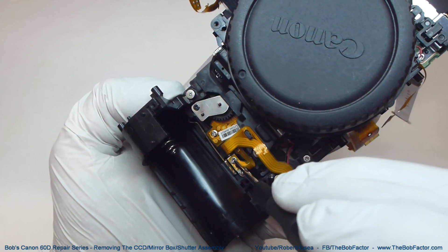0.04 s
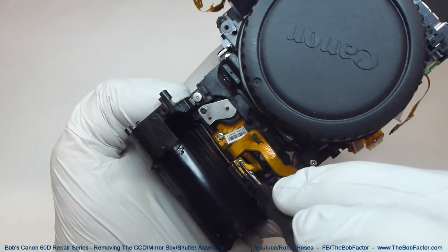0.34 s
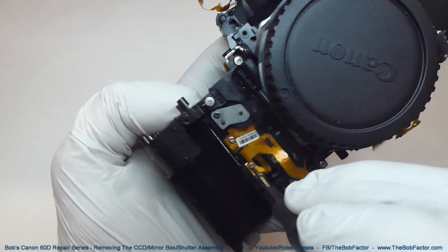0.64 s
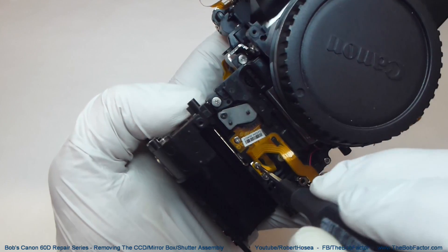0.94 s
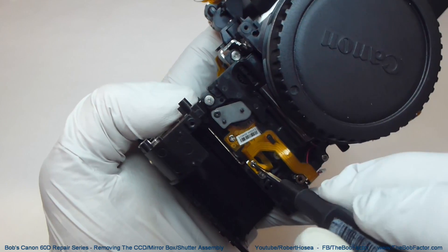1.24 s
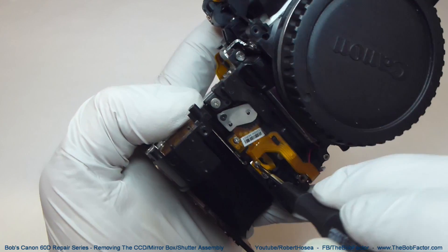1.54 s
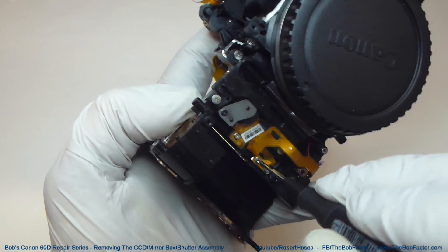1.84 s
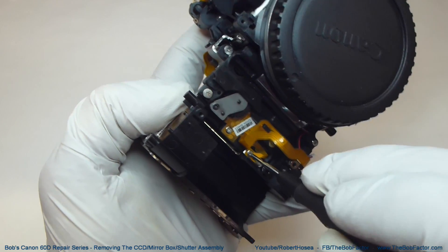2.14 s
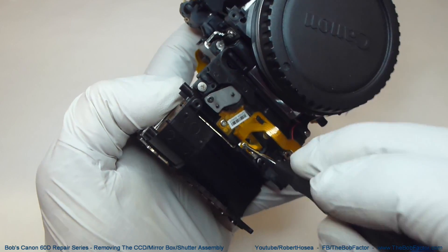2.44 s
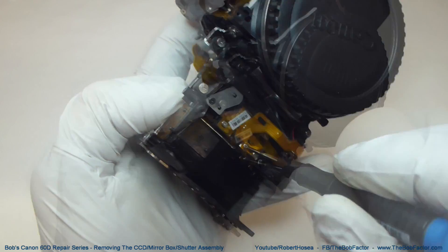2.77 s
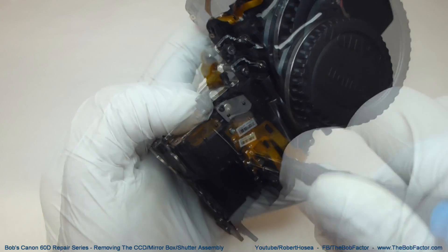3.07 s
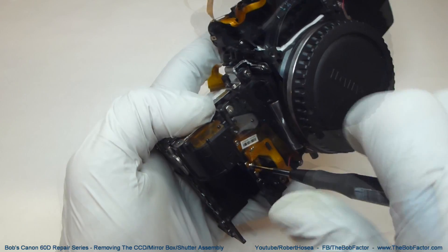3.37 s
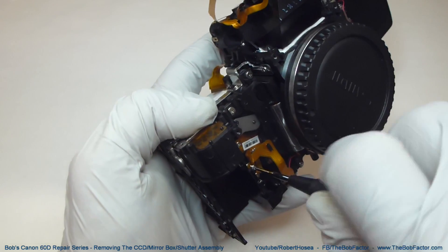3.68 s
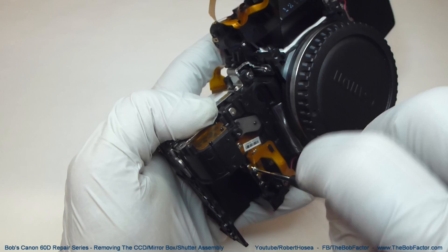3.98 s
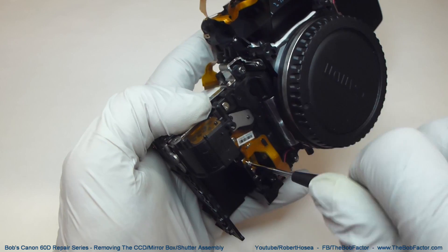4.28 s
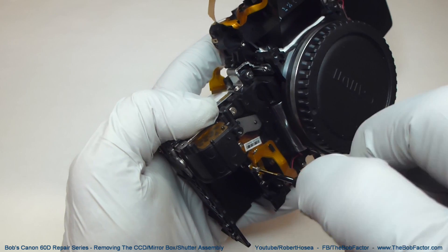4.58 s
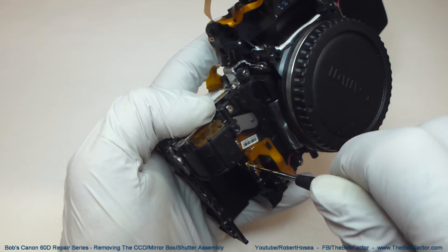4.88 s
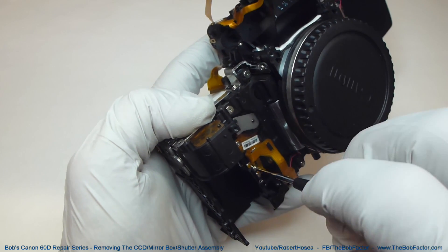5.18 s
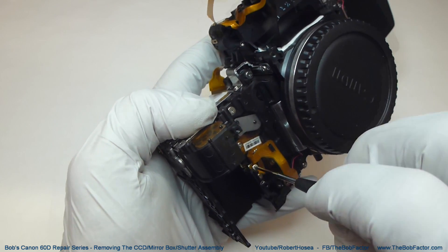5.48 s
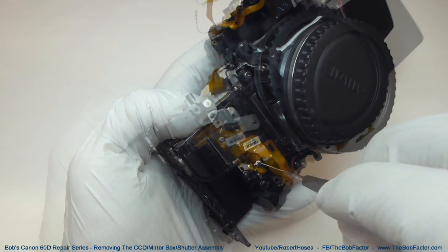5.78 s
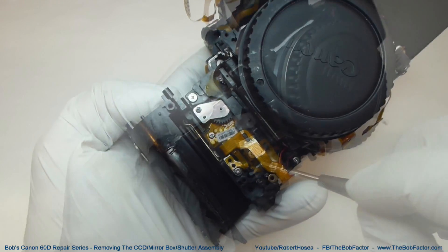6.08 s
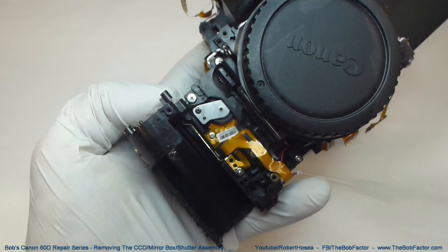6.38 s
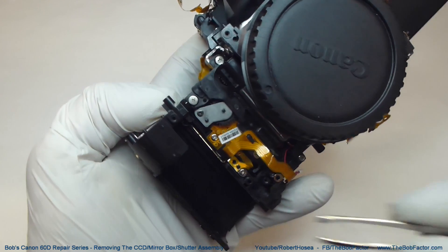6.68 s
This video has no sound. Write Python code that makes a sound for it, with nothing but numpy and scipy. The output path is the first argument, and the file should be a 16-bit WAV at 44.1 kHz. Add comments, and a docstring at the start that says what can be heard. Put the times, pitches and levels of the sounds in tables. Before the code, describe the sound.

A small screwdriver knocks in the screw heads of a camera body, making a few sharp, separate clicks with a very short metallic ring. After the loudest click, a tight screw gives a quick cluster of high squeaks. Lighter ticks and faint rubbing of gloves on the handle follow. The sounds are close and fairly dry, over quiet room hiss and a faint electrical hum.

```python
"""A small screwdriver works on the screws of a camera body, held in gloved hands over a desk.
The bit ticks in the screw heads and rings the chassis; one tight thread sticks and slips in quick squeaks.
Gloves rub the handle in short strokes, over quiet room hiss, faint mains hum and a late low drone.
A gain control ducks after the loudest sounds and creeps back."""
import sys
import numpy as np
from scipy import signal
from scipy.fft import rfft, irfft, next_fast_len
from scipy.io import wavfile
from scipy.ndimage import uniform_filter1d, map_coordinates

SR = 44100
rng = np.random.default_rng(int(sys.argv[2]) if len(sys.argv) > 2 else 0)


def wrap_up_sound(samples):
    """Save the sound to the file named by the first command line argument, as 16-bit audio."""
    columns = np.atleast_2d(samples).T
    # keep every value between -1 and 1, then stretch to whole-number steps
    tamed = np.clip(columns, -1, 1)
    steps = np.round(tamed * 32767).astype(np.int16)
    wavfile.write(sys.argv[1], SR, steps)


N = 305172


def knocks(crack_t60_s=0.015, build_up_s=0.00049, detune=0.008, notch_hz=1550, notch_q=5):
    """Bit knocks in a screw head: a short crack plus a hand-damped chassis ring."""
    # (time [s], level [dB], crack re ring [dB], hardness [dB/octave], ring pitch [ratio])
    hits = [(0.0438, -20, -17.5, 7.5, 1.03), (0.0683, -23, -19, 9, 1.02), (0.3246, -10.5, -8.5, -7, 1),
            (0.9262, -12, -12.5, 1, 1.02), (1.7914, -23, -12, -11.5, 1.02), (2.2844, -40, 1.5, 8, 1.1),
            (2.6506, 2, -14, 4.5, 1.0), (3.0454, -44, -2.5, 4, 0.96), (4.6225, -27.5, -2, -11.5, 1.05)]
    # chassis modes: (frequency [Hz], level [dB], t60 [s])
    modes = [(1092, -24, 0.018), (1140, -10, 0.029), (2130, -34, 0.015), (2136, 6, 0.02), (2265, -5, 0.031),
             (2500, -15.5, 0.053), (2500, -14, 0.021), (2890, -18, 0.033), (3460, -17, 0.014),
             (3600, -20, 0.009), (4290, -28, 0.015), (5170, -18, 0.015), (6920, -38, 0.067),
             (9100, -38, 0.033)]
    # (frequency [Hz], density [dB])
    crack_spectrum = [(400, -41), (1150, -5.5), (1550, 6), (2200, 13), (3400, 6.5), (4700, 2),
                      (7000, -13.5), (10500, -8.5), (16000, -21)]
    out, t = np.zeros(N), np.arange(SR // 10) / SR
    hz, mode_db, t60_s = np.transpose(modes)[:, :, None]
    build_up = 1 - np.exp(-t / build_up_s)
    for s, db, crack_db, hardness, pitch in hits:
        # grip and contact point perturb the modes; hard contact favours the high ones
        shift, strength = rng.standard_normal((2, len(hz), 1))
        level_db = mode_db + 2 * strength + hardness * np.log2(hz / hz[0])
        ring_hz = hz * (pitch + detune * shift)
        ring = np.sum(amp(level_db - 60 * t / t60_s) * np.sin(2 * np.pi * ring_hz * t), axis=0)
        crack = coloured(rng.standard_normal(len(t)), crack_spectrum)
        crack *= amp(crack_db - 60 * t / crack_t60_s)
        add(out, s, amp(db) * (build_up * ring / np.abs(ring).max() + crack))
    # antiresonance between the lowest mode groups; a small body radiates little bass
    out = signal.lfilter(*signal.iirnotch(notch_hz, notch_q, SR), out)
    return signal.sosfilt(signal.butter(3, 700, "high", fs=SR, output="sos"), out)


def squeaks(slide_hz=8400, bite_s=0.0019, free_s=0.0019, free_share=0.57, rise_power=3.4):
    """Thread stick-slip: pitch drops as it bites, steadies, then rises and frays as it lets go."""
    # (time [s], level [dB], pitch [Hz], length [s], pitch rise [share], fade [dB], roughness [0-1])
    bites = [(3.8008, -1, 6690, 0.0014, 0.0021, 6.5, 0), (3.8048, -20, 7600, 0.0042, 0.01, -3, 0.3),
             (3.8792, -11.5, 5555, .0105, .08, 1.5, 0.37), (3.9154, -7, 5514, 0.012, 0.25, 11, .2)]
    # frayed stick-slip: (frequency [Hz], density [dB])
    rasp_spectrum = [(4500, -8), (5600, -7), (8500, 4), (9800, -19), (11500, -6), (16000, 3.5)]
    # screw radiation: (frequency [Hz], gain [dB])
    radiation = [(2500, -28), (4600, -5), (5500, -3), (8300, 1), (9800, -9), (11000, -2), (12000, 1),
                 (13500, -6), (16000, -12.5)]
    octave_db, rasp_db = -6, -9
    edge_drop_db, edge_rough = 22.5, 0.55
    jitter, waver, flutter_db = 0.062, 0.008, 4.0
    out, t = np.zeros((2, N)), np.arange(-SR // 100, SR // 25) / SR
    for s, level_db, pitch_hz, length_s, rise, fade_db, held_rough in bites:
        progress = np.maximum(t / length_s, 0)
        biting = np.maximum(-t, 0) / bite_s
        freeing = np.maximum(t - length_s, 0) / (free_s + free_share * length_s)
        rising_hz = pitch_hz * (1 + rise * progress ** rise_power)
        hz = np.minimum(rising_hz + biting * (slide_hz - pitch_hz), slide_hz)
        db = level_db - fade_db * np.minimum(progress, 1) - edge_drop_db * (biting + freeing)
        rough = np.interp(biting + freeing, [0, 1], [held_rough, edge_rough])
        # uneven friction shakes pitch and level
        unsteady = jitter * rough * wobble(2560, len(t)) + waver * wobble(682, len(t))
        phase = 2 * np.pi * np.cumsum(hz * (1 + unsteady)) / SR
        strength = np.sqrt(2) * amp(db + flutter_db * np.sqrt(rough) * wobble(800, len(t)))
        for side in out:
            # partials beam unevenly, the octave most, so each side swells differently
            fundamental, octave = (
                amp(k * wobble(500, len(t))) * np.sin(k * phase + 0.15 * k * wobble(300, len(t)))
                for k in (1, 2))
            rasp = amp(rasp_db) * rough * coloured(rng.standard_normal(len(t)), rasp_spectrum)
            add(side, s + t[0], strength * (fundamental + amp(octave_db) * octave + rasp))
    return filtered(out, lambda hz: amp(along(radiation, hz)))


def taps(attack_s=0.0003, t60_s=0.026):
    """Light touches stir only the part under the tip: dry one-band ticks."""
    # (time [s], level [dB], centre [Hz], width [octaves])
    touches = [(1.528, -42, 6400, 0.45), (3.1504, -48, 5500, 0.28), (3.182, -45, 4500, 0.18),
               (3.3845, -43.5, 4200, 0.45), (3.7983, -38, 1430, 0.48), (3.829, -40, 4170, 0.31),
               (3.9718, -44, 4300, 0.56), (4.625, -46, 3920, .25), (4.9010, -41, 4840, .3),
               (5.133, -42, 1680, 1.2), (5.2295, -49, 4500, 0.22), (5.3390, -43.5, 5850, 1.1),
               (6.388, -39, 3200, 0.7)]
    out, t = np.zeros(N), np.arange(SR // 10) / SR
    envelope = amp(-60 * t / t60_s) * (1 - np.exp(-t / attack_s))
    for s, db, centre_hz, octaves in touches:
        bell = lambda hz: np.exp(-0.5 * (np.log2((hz + 1) / centre_hz) / octaves) ** 2)
        band = filtered(rng.standard_normal(len(t)), bell)
        add(out, s, amp(db) * unit(band) * envelope)
    return out


def slips(grain_db=3, grain_hz=1196):
    """Tip skids on metal: gritty bursts that swell and die."""
    # (time [s], level [dB], length [s])
    skids = [(0.315, -36, 0.0069), (2.879, -52, 0.039), (3.538, -51, 0.0085), (4.249, -55.5, 0.017),
             (4.776, -47.5, 0.0092), (5.413, -48.5, 0.017), (5.785, -53.5, 0.053), (6.27, -47, 0.024)]
    # (frequency [Hz], density [dB])
    skid_spectrum = [(250, -65), (800, 1.5), (2500, -3.5), (4500, -1.5), (7000, 2.5), (10500, 4),
                     (13000, -5), (16000, -11)]
    out, t = np.zeros(N), np.arange(SR // 5) / SR
    for s, db, length_s in skids:
        grit = rng.standard_normal(len(t)) * amp(grain_db * wobble(grain_hz, len(t)))
        age = 3 * t / length_s
        add(out, s, amp(db) * coloured(grit, skid_spectrum) * age * np.exp(1 - age))
    return out


def chafes(width_hz=1300, grain_db=4, grain_hz=239.5):
    """Turning bit: weak stick-slip, a grainy band with no settled pitch."""
    # (mid time [s], level [dB], centre [Hz], length [s])
    turns = [(2.088, -63, 5230, 0.097), (3.148, -65, 5250, 0.072), (4.24, -59, 4850, 0.032),
             (4.506, -60, 4630, 0.083), (4.876, -58, 4780, 0.077), (5.057, -60.5, 5110, 0.097),
             (6.391, -57, 4420, 0.045)]
    out = np.zeros(N)
    for s, db, hz, length_s in turns:
        t = np.arange(-2 * length_s, 2 * length_s, 1 / SR)
        envelope = amp(db + grain_db * wobble(grain_hz, len(t))) * np.exp(-2 * (t / length_s) ** 2)
        add(out, s + t[0], envelope * narrow(hz, width_hz, t))
    return out


def gloves(grip_db=-69.5, grain_db=2.0, sway_db=2.5, snags_per_s=39, snag_s=0.003, crackle_db=-8.5):
    """Rubber drags on the handle in tiny catches; the pushed bit crackles."""
    # (start [s], length [s], level [dB])
    strokes = [(2.046, 0.27, -64), (2.446, 0.17, -60), (3.072, .13, -62.5), (3.358, .035, -51),
               (3.41, 0.14, -60), (3.667, 0.21, -59.5), (4.129, 0.16, -57), (4.398, 0.24, -57.5),
               (4.76, 0.17, -56.5), (4.987, .2, -55.5), (5.806, 0.037, -56.5), (6.064, .11, -58),
               (6.334, 0.13, -59.5)]
    # both: (frequency [Hz], density [dB])
    rub_spectrum = [(700, -37), (1500, -5), (3000, -6.5), (4700, 0.5), (6500, -1), (8500, -2.5),
                    (11000, -2.5), (16000, -12.5)]
    crackle_spectrum = [(500, -30), (2800, -10), (4700, 1.5), (6500, -5), (15000, -13)]
    envelopes = [amp(db) * held(s, length_s, attack_s=0.022, release_s=0.03)
                 for s, length_s, db in strokes]
    drag = np.maximum(np.max(envelopes, axis=0), amp(grip_db))
    catches = rng.standard_normal(N) * amp(grain_db * wobble(900, N))
    onsets = 1.0 * (rng.random(N) < snags_per_s / SR)
    snags = signal.lfilter([1], [1, -np.exp(-1 / (snag_s * SR))], onsets)
    crackle = amp(crackle_db) * coloured(snags * rng.standard_normal(N), crackle_spectrum)
    return drag * amp(sway_db * wobble(45, N)) * (coloured(catches, rub_spectrum) + crackle)


def air(level_db=-48.5):
    """Steady room noise: wide mids, centred bass."""
    # (frequency [Hz], density [dB])
    spectrum = [(15, -51), (25, -27), (48, -14.5), (84, -13.5), (113, -9), (148, -8), (205, -8.5),
                (241, -4.5), (284, -6.5), (729, -9), (955, -11.5), (2150, -16), (2330, -16.5),
                (12400, -28.5), (15800, -39)]
    # (frequency [Hz], left-right correlation [-1 to 1])
    correlation = [(60, 0.46), (150, 0.28), (290, 0.1), (640, -0.52), (1400, -0.76), (3100, -0.64),
                   (6800, -0.25), (15000, 0.29)]
    angle = lambda hz: np.arccos(np.clip(along(correlation, hz), -1, 1)) / 2
    split = lambda hz: np.array([np.cos(angle(hz)), np.sin(angle(hz))])
    mid, side = filtered(rng.standard_normal((2, N)), split)
    return amp(level_db) * coloured(np.array([mid + side, mid - side]), spectrum)


def hum(double_hz=119.4, steady_db=-71, swell_db=-61.5, drift_rad=0.3):
    """Mains lines; the one at twice the mains rate swells for a few seconds."""
    # steady lines: (frequency [Hz], level [dB])
    mains = [(59.8, -72), (180, -70), (240, -69), (300, -73), (600, -74), (720, -70)]
    t = np.arange(N) / SR

    def line(hz):
        return np.sqrt(2) * np.sin(2 * np.pi * (hz * t + rng.random()) + drift_rad * wobble(3.86, N))

    swell = amp(swell_db) * held(start_s=0.93, length_s=2.35, attack_s=0.43, release_s=0.43)
    return (amp(steady_db) + swell) * line(double_hz) + sum(amp(db) * line(hz) for hz, db in mains)


def drone(level_db=-57, centre_hz=265, width_hz=45):
    """Soft, narrow low noise; grows near the end."""
    swell = held(start_s=6.42, length_s=0.36, attack_s=0.19, release_s=0.19)
    return amp(level_db) * swell * narrow(centre_hz, width_hz, np.arange(N) / SR)


def background():
    """Air, drone and hum; the level dips briefly twice."""
    # (mid time [s], depth [dB], half length [s])
    dips = [(3.03, 3, 0.29), (5.887, 3.5, 0.3)]
    t = np.arange(N) / SR
    dip_db = sum(depth_db * np.exp(-((t - s) / half_s) ** 2) for s, depth_db, half_s in dips)
    return amp(-dip_db) * (air() + drone() + hum())


def at_microphone(x, pan_db, desk_db, near_db, room_db, near_t60_s, desk_s=0.0055):
    """Direct sound, desk bounce, nearby scatter and room tail."""
    # (frequency [Hz], t60 [s])
    room_decay = [(300, 0.25), (2200, 0.27), (6000, 0.4), (12000, 0.19), (16000, 0.099)]
    hz, frame_s, spectra = signal.stft(rng.standard_normal((2, SR // 2)), SR, nperseg=256)
    decay = amp(-60 * frame_s / along(room_decay, hz)[:, None])
    tail = signal.istft(spectra * decay, SR, nperseg=256)[1]
    t = np.arange(tail.shape[1]) / SR
    near = rng.standard_normal(tail.shape) * amp(-60 * t / near_t60_s)
    echoes = (amp(room_db) * unit(tail) + amp(near_db) * unit(near)) / np.sqrt(len(t))
    echoes[:, 0] += amp(desk_db)
    delayed = np.pad(np.atleast_2d(x), ((0, 0), (round(desk_s * SR), 0)))
    reflected = signal.fftconvolve(delayed, echoes, axes=1)[:, :N]
    return (x + reflected) * amp([[pan_db / 2], [-pan_db / 2]])


def gain_control(x, threshold_db=-13.5, cut_db_per_db=0.69, recover_db_per_s=8):
    """Gain drops at once above the threshold, then climbs back steadily."""
    power = np.abs(uniform_filter1d(np.mean(x ** 2, axis=0), size=132))
    needed_db = cut_db_per_db * np.maximum(10 * np.log10(power + 1e-20) - threshold_db, 0)
    climb_db = recover_db_per_s * np.arange(N) / SR
    cut_db = np.maximum.accumulate(needed_db + climb_db) - climb_db
    return x * amp(-uniform_filter1d(cut_db, size=44))


def amp(db):
    """dB to gain."""
    return 10 ** (np.asarray(db) / 20)


def unit(x):
    """Scale to rms 1."""
    return x / np.sqrt(np.mean(x ** 2) + 1e-20)


def along(points, hz):
    """Interpolate (Hz, value) points on a log axis."""
    knot_hz, values = np.transpose(points)
    return np.interp(np.log(hz + 1), np.log(knot_hz + 1), values)


def held(start_s, length_s, attack_s, release_s):
    """Envelope: reaches 1 at the start, holds, decays."""
    t = np.arange(N) / SR - start_s
    return np.exp(np.minimum(t, 0) / attack_s - np.maximum(t - length_s, 0) / release_s)


def wobble(rate_hz, size):
    """Smooth random curve, rate_hz knots a second."""
    knots = rng.standard_normal(int(size * rate_hz / SR) + 4)
    return map_coordinates(knots, [np.arange(size) * rate_hz / SR])


def filtered(x, response):
    """Apply a gain given as a function of Hz."""
    size = x.shape[-1]
    padded = next_fast_len(size + 8192)
    return irfft(rfft(x, padded) * response(np.fft.rfftfreq(padded, 1 / SR)), padded)[..., :size]


def coloured(x, spectrum):
    """Shape by (Hz, dB) points; rms 1."""
    return unit(filtered(x, lambda hz: amp(along(spectrum, hz))))


def narrow(centre_hz, width_hz, t):
    """Narrowband noise: a tone of wandering level and phase."""
    wander = wobble(width_hz, len(t)) + 1j * wobble(width_hz, len(t))
    return np.real(wander * np.exp(2j * np.pi * centre_hz * t))


def add(track, start_s, x):
    """Mix x into the track."""
    part = track[max(round(start_s * SR), 0):][:len(x)]
    part += x[:len(part)]


def scene():
    """Tool and hands over the room background."""
    ticks = at_microphone(knocks() + taps(),
                          pan_db=-1.5, desk_db=-10.5, near_db=-15, room_db=-18, near_t60_s=0.069)
    screw = at_microphone(squeaks(),
                          pan_db=-3, desk_db=-22.5, near_db=-15, room_db=-18.5, near_t60_s=0.06)
    handling = at_microphone(gloves() + slips() + chafes(),
                             pan_db=-4, desk_db=-32, near_db=-9, room_db=-11, near_t60_s=0.05)
    return ticks + screw + handling + background()


def record(dry):
    """Gain control, then band limit."""
    return filtered(gain_control(dry), lambda hz: hz < 15900)


dry = scene()
out = record(dry)
wrap_up_sound(out)
```